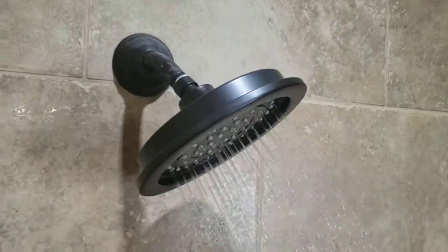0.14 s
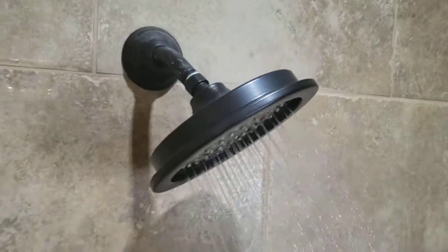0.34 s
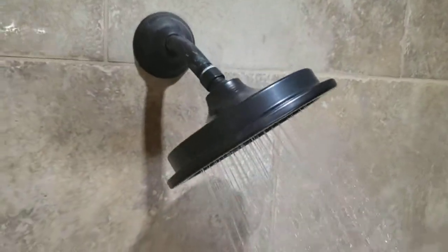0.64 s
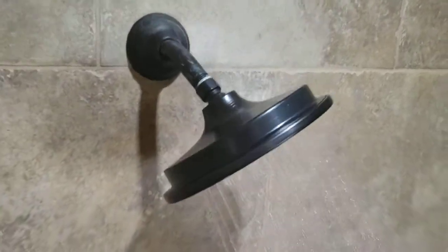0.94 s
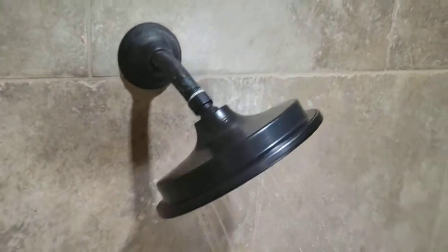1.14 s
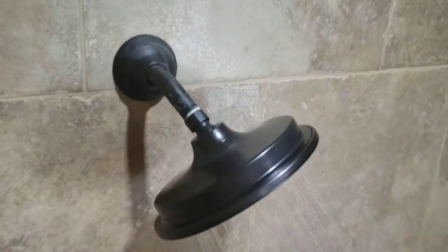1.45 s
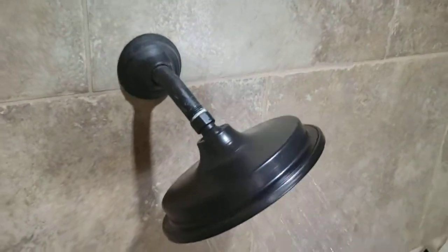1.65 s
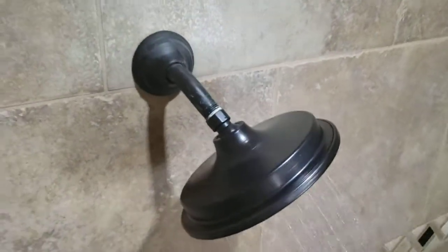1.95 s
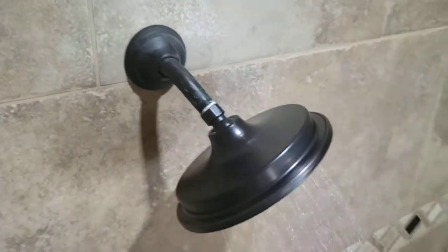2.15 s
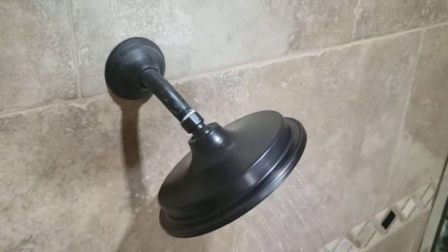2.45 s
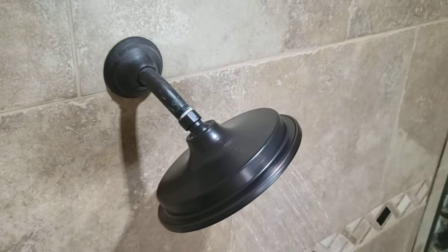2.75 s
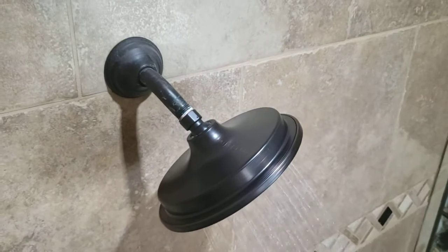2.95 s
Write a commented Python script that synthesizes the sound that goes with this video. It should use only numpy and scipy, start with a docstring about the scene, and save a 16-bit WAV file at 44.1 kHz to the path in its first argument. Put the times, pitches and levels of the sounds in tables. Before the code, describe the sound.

Steady shower spray hissing close by, water pattering on tile, with small drips and brief spits

```python
"""A shower head sprays in a tiled stall, close to a hand-held camera that rises past it. Throughout, noise from
fine jets fizzes high up, spray patters on tiles, a dull wash and hum lie beneath, and the hand on the camera
rumbles low. From the first moments fat drops plink as rising sines; soon gushes, gurgles and sputters join as
noise bursts. Near 1 s the camera passes the head and the air modes change; sputters crowd at 1.3 s. The hand
bumps the camera at 1.4 s and 2.7 s, each a smooth pulse; two higher gurgles close the scene."""
import sys
import numpy as np
from scipy import signal
from scipy.fft import rfft, irfft, next_fast_len
from scipy.io import wavfile
from scipy.ndimage import uniform_filter1d, map_coordinates

SR = 44100
rng = np.random.default_rng(int(sys.argv[2]) if len(sys.argv) > 2 else 0)


def waveform_to_disk(signal):
    """Save audio, clipped to [-1, 1], as 16-bit WAV at the path in sys.argv[1]."""
    frames = np.transpose(np.atleast_2d(signal))
    scaled = np.clip(frames, -1, 1) * 32767
    samples = np.round(scaled).astype(np.int16)
    wavfile.write(sys.argv[1], SR, samples)


N = 136269

# Levels are those at the source, ahead of the microphone colour.
# Low rumble: (time [s], level [dB], left-right [dB]); spectrum (frequency [Hz], gain [dB])
RUMBLE_LEVEL = [(0.0, -57.5, -3), (0.96, -65.5, 8), (1.94, -63.5, 6), (3.09, -64, 2.5)]
RUMBLE_SPECTRUM = [(22, -17), (32, -25), (47, 19), (60, -6), (70, -26)]
# Stall hum: (time [s], level [dB], left-right [dB]); spectrum (frequency [Hz], gain [dB])
HUM_LEVEL = [(0.0, -63, -1), (0.11, -52, 3), (0.21, -62, 1.5), (1.29, -54.5, 4), (1.36, -61.5, 8),
             (1.51, -53.5, 4), (2.54, -58, 3), (2.83, -49, 2.5), (2.96, -54, 2), (3.09, -58, 4)]
HUM_SPECTRUM = [(58, -33), (68, -5), (79, 0), (100, -13), (118, 0.5), (132, 0.5), (160, -10), (200, -59)]
# Dull wash of the stall: (time [s], mean level [dB], left-right [dB]); spectrum (frequency [Hz], gain [dB])
WASH_LEVEL = [(0.0, -50.5, -4), (0.02, -52, 0.5), (0.54, -52.5, 2), (0.68, -55.5, 2), (0.8, -49.5, 2),
              (0.89, -55, 3), (1.21, -52.5, -1), (1.27, -49, 3), (1.4, -53.5, 1.0), (2.22, -56, 0),
              (3.0, -54, 0), (3.09, -58, -2)]
WASH_SPECTRUM = [(88, -42), (150, -8), (206, -7), (495, -3.5), (618, -11.5), (787, -0.5), (883, -9),
                 (1500, -11.5), (1950, -99), (3300, -120)]
# Air modes between the walls:
# (frequency [Hz], width at half lift [Hz], lift below the head [dB], lift above the head [dB])
AIR_MODES = [(191, 27, 9, 4.5), (256.3, 22, 9, 6.5), (323, 11, 4.5, -2), (370.3, 25, 5.5, 7.5),
             (470, 28, 8, 3.5), (498.6, 9.9, -3, 10.5), (570.5, 6.7, 6, 12), (812, 31, 6, -1),
             (997, 33, 9.5, 8.5), (1592, 25, 8, 9.5), (1850, 27, 8.5, 7.5), (2095, 250, 0.5, 4.5),
             (4080, 180, 1.5, 3.5)]
# Gurgles: (start [s], length [s], top level [dB], left-right [dB], centre [Hz], Gaussian sigma [Hz])
GURGLES = [(0.303, .17, -55, 6, 470, 38.4), (0.47, 0.16, -52.5, 6, 477, 39),
           (2.527, 0.3, -52.5, 5, 2130, 110), (2.89, 0.17, -53, 5, 2200, 119)]
# Hand bumps: (time [s], nominal level [dB], left-right [dB])
BUMPS = [(1.381, -35, 14.5), (2.68, -37, 16)]
# Fat drops: (time [s], level before decay and soft start [dB], left-right [dB], starting pitch [Hz])
DROPS = [(.025, -37.5, -1, 2470), (0.295, -34, 0, 2840), (1.26, -40.5, -1, 481), (1.253, -36, 1, 1350),
         (1.253, -38, -3, 1714), (1.279, -40, 0, 2650), (1.292, -41, -1, 2000), (1.298, -40, -1, 2200),
         (1.861, -35, -2, 1655), (2.242, -38, 2, 2136), (2.929, -39, -9, 3980), (2.97, -49, 1, 2160),
         (3.047, -40, 0, 3950)]
# Spray on the tiles: (time [s], mean level [dB], left-right [dB]); spectrum (frequency [Hz], gain [dB])
PATTER_LEVEL = [(0.0, -39, 2.5), (.59, -39.5, 2), (.66, -43.5, 1.5), (.74, -39, 1.5), (1.17, -41.5, 2),
                (1.31, -37.5, 2.5), (1.4, -42, 2), (1.55, -41, 1.5), (1.83, -42.5, -0.5), (2.02, -40, 0.5),
                (2.14, -43.5, 0.5), (2.22, -40.5, -1.5), (2.49, -43, -1), (3.09, -42, 0)]
PATTER_SPECTRUM = [(650, -30), (1100, -7.5), (1220, -8.5), (1560, -6.5), (1710, -7.5), (2100, -3.5),
                   (2880, -2.5), (4050, 0.5), (6290, -3.5), (7420, -15), (8000, -4.5), (10400, -18),
                   (17600, -120)]
# Sputters: (time [s], nominal peak [dB], left-right [dB], centre [Hz], body t60 [s], start/body amplitude [1])
SPUTTERS = [(0.3444, -14, 3.5, 11400, 0.065, .5), (0.3562, -11, 9, 12100, 0.27, 1.5),
            (0.5194, -20, 1.5, 11900, 0.039, .8), (0.6838, -11.5, 9, 11800, 0.045, .8),
            (0.7756, -16, 13, 11800, 0.18, .8), (0.9994, -17.5, 14, 12200, 0.16, 0.87),
            (1.1273, -15, 9, 13800, 0.12, .8), (1.2754, -17, 17, 13500, 0.1, .3),
            (1.291, -18, 22, 13000, 0.15, .3), (1.3125, -6, 20.5, 15400, 0.053, 1.2),
            (1.3344, -10.5, 8, 12500, 0.19, .6), (1.321, -11.5, 18, 13600, 0.11, .2),
            (1.9121, -21, 7, 12600, 0.06, .8), (2.0911, -16.5, 6, 11400, 0.15, .4),
            (2.132, -16, 5, 11700, 0.065, .2), (2.153, -15, 8, 12000, 0.12, 0.22),
            (2.3194, -22, 8, 11100, 0.1, .8), (2.509, -19, 7, 12100, 0.1, .2),
            (2.517, -15.5, 7, 12800, 0.13, .2)]
# Duller gushes: (time [s], nominal peak [dB], left-right [dB], centre [Hz], t60 [s])
SURGES = [(0.148, -25, 0, 3500, .1), (.543, -26, 2, 3900, 0.12), (1.261, -30.5, 6, 2140, 0.37),
          (1.941, -25.5, 4, 6600, 0.15), (2.324, -25.5, 0, 6800, 0.29), (2.914, -29, -3, 4300, .15)]
# Jet fizz: (time [s], level before the lift of JET_LIFT_DB [dB], left-right [dB]);
# spectrum (frequency [Hz], gain [dB])
JET_LEVEL = [(0.0, -32.5, 8), (0.27, -36, 9), (0.62, -34, 10.5), (1.02, -35, 11), (1.21, -35, 12),
             (1.31, -32.5, 15), (1.34, -35.5, 18.5), (1.45, -37.5, 4.5), (1.57, -38, 6), (2.1, -37, 5.5),
             (2.14, -37.5, 8.5), (2.64, -39, 7), (3.09, -37.5, 7)]
JET_SPECTRUM = [(4120, -14), (7000, -11.5), (7880, -19), (8960, -8), (11700, 2.5), (15100, 0.5),
                (15700, 3.5)]
# Left-right likeness of the water: (frequency [Hz], correlation [1])
LIKENESS = [(60, 0.98), (290, 0.9), (640, 0.59), (1200, 0.0065), (15000, 0)]
# Microphone colour: (frequency [Hz], left-right [dB])
MIC_COLOUR = [(1500, -0.5), (2500, -4), (5000, -6.5), (7300, -1), (8400, 5.5), (10000, -2), (12000, -8),
              (15500, -6)]

PASS_HEAD_S, PASS_LENGTH_S = 0.98, 0.91  # middle and length of the passage
BUMP_TIME_CONSTANT_S, BUMP_LIFT_DB = 0.002, 8.5
DROP_T60_AT_2KHZ_S, DROP_ATTACK_S = 0.043, 0.0017
DROP_PITCH_RISE = 0.058  # share of the pitch gained per DROP_T60_AT_2KHZ_S
BODY_SIGMA_HZ, START_SIGMA_HZ, START_T60_S = 1740, 2740, 0.018
SPUTTER_ATTACK_S, SPUTTER_CREST_DB = 0.0009, 12
JET_LIFT_DB, TOP_HZ = 4.0, 15750


def amp(db):
    """Amplitude from dB."""
    return 10 ** (np.asarray(db) / 20)


def unit(x):
    """Scale to rms 1."""
    return x / np.sqrt(np.mean(x ** 2) + 1e-20)


def along(points, hz):
    """Interpolate (Hz, value) points on a log-frequency axis."""
    f, v = np.transpose(points)
    return np.interp(np.log(hz + 1), np.log(f + 1), v)


def panned(db, pan_db):
    """Left and right gains, pan_db apart."""
    return amp(np.array([db + pan_db / 2, db - pan_db / 2]))


def level(rows):
    """Stereo gain along a (s, dB, left-right dB) curve."""
    s, db, pan_db = np.transpose(rows)
    t = np.arange(N) / SR
    return panned(np.interp(t, s, db), np.interp(t, s, pan_db))


def add_at(out, s, sound):
    """Add a stereo sound into out at time s."""
    out[:, round(s * SR):][:, :sound.shape[-1]] += sound


def wobble(knots_per_s):
    """Smooth random curve through normal knots."""
    knots = rng.standard_normal(int(N * knots_per_s / SR) + 4)
    return map_coordinates(knots, [np.arange(N) * knots_per_s / SR])


def filtered(x, response):
    """Multiply the spectrum of x by a response of frequency."""
    m = next_fast_len(x.shape[-1] + 8192)
    return irfft(rfft(x, m) * response(np.fft.rfftfreq(m, 1 / SR)), m)[..., :x.shape[-1]]


def closed(points):
    """Gain of a spectrum that is silent beyond its ends."""
    return lambda hz: amp(along(points, hz)) * (hz > points[0][0]) * (hz < points[-1][0])


def bell(hz, sigma_hz):
    """Gain of a Gaussian band."""
    return lambda f: np.exp(-.5 * ((f - hz) / sigma_hz) ** 2)


def decaying(kicks, life_s):
    """Give each kick an exponential tail with time constant life_s."""
    return signal.lfilter([1], [1, -np.exp(-1 / (life_s * SR))], kicks)


def droplets(per_s, spread_db, life_s):
    """Tiny impacts of uneven size, each a short puff of noise on both sides, rms 1."""
    chance, size = rng.random((2, N))
    impacts = (chance < per_s / SR) * amp(spread_db * size ** 2)
    return unit(decaying(impacts, life_s) * rng.standard_normal((2, N)))


def flicker(per_s, life_s):
    """Sudden small rises that fade, mean about 0, rms 1."""
    chance, size = rng.random((2, N))
    rises = decaying((chance < per_s / SR) * size, life_s)
    return unit(uniform_filter1d(rises - rises.mean(), size=60))


def water(gain, patchy_db, grains):
    """Noise patchy in time and frequency plus droplets, coloured, part-correlated left-right, rms 1."""
    z = signal.stft(rng.standard_normal((2, N)), nperseg=512)[2]
    field = uniform_filter1d(rng.standard_normal(z.shape[1:]), size=4, axis=0)
    field = unit(uniform_filter1d(field, size=7, axis=1))
    patchy = signal.istft(z * amp(patchy_db * field), nperseg=512)[1][:, :N]
    pair = unit(patchy) + grains

    def mid_side_gain(hz):
        turn = np.arccos(np.clip(along(LIKENESS, hz), 0, 1)) / 2
        return gain(hz) * np.array([np.cos(turn), np.sin(turn)])

    mid, side = filtered(pair, mid_side_gain)
    return unit(np.array([mid + side, mid - side]))


def air(x):
    """Air between the walls lifts its modes; the lifts crossfade as the camera passes the head."""
    def lift(column):
        def gain(f):
            return amp(sum(m[column] / (1 + (2 * (f - m[0]) / m[1]) ** 2) for m in AIR_MODES))
        return gain

    above = np.clip((np.arange(N) / SR - PASS_HEAD_S) / PASS_LENGTH_S + .5, 0, 1)
    return (1 - above) * unit(filtered(x, lift(2))) + above * unit(filtered(x, lift(3)))


def rumble():
    """Low band of noise from the hand handling the camera."""
    return level(RUMBLE_LEVEL) * water(closed(RUMBLE_SPECTRUM), patchy_db=1.0, grains=0)


def hum():
    """Lowest hum of the stall, a noise band with a wandering level."""
    return level(HUM_LEVEL) * water(closed(HUM_SPECTRUM), patchy_db=0.8, grains=0)


def wash():
    """Dull wash of the stall, noise coloured by the air modes."""
    noise = water(closed(WASH_SPECTRUM), patchy_db=1.4, grains=0)
    return amp(1.2 * wobble(8.6)) * level(WASH_LEVEL) * air(noise)


def gurgles():
    """Narrow bands of patchy noise swell and fade over half a sine."""
    out, t = np.zeros((2, N)), np.arange(N) / SR
    for s, length_s, db, pan_db, hz, sigma_hz in GURGLES:
        swell = np.sin(np.pi * np.clip((t - s) / length_s, 0, 1))
        noise = water(bell(hz, sigma_hz), patchy_db=5.9, grains=0)
        out += panned(db, pan_db)[:, None] * swell * noise
    return out


def bumps():
    """The hand bumps the camera: one soft push that swings back."""
    out, u = np.zeros((2, N + SR)), np.arange(SR // 8) / SR / BUMP_TIME_CONSTANT_S
    push = u * (2 - u) * np.exp(-u) / 2
    for s, db, pan_db in BUMPS:
        add_at(out, s, panned(db + BUMP_LIFT_DB, pan_db)[:, None] * push)
    return out[:, :N]


def drops():
    """Fat drops plink: decaying sines of rising pitch, the lower ones ringing longer."""
    out, t = np.zeros((2, N + SR)), np.arange(SR // 8) / SR
    attack = 1 - np.exp(-t / DROP_ATTACK_S)
    for s, db, pan_db, hz in DROPS:
        decay = amp(-60 * t / DROP_T60_AT_2KHZ_S * np.sqrt(hz / 2000))
        cycles = hz * t * (1 + DROP_PITCH_RISE / 2 * t / DROP_T60_AT_2KHZ_S)
        plink = decay * attack * np.sin(2 * np.pi * cycles)
        add_at(out, s, panned(db, pan_db)[:, None] * plink)
    return out[:, :N]


def patter():
    """Spray lands on the tiles: noise and tiny impacts, coloured by the air modes."""
    grains = amp(-9) * droplets(per_s=400, spread_db=12, life_s=.001)
    spray = water(closed(PATTER_SPECTRUM), patchy_db=1.5, grains=grains)
    return amp(1.0 * wobble(9)) * level(PATTER_LEVEL) * air(spray)


def sputters():
    """Bursts of coarse fizz: a broad sharp start over a narrower body; surges are body alone."""
    out, t = np.zeros((2, N + SR)), np.arange(SR // 4) / SR
    attack = 1 - np.exp(-t / SPUTTER_ATTACK_S)
    surges = [(*row, 0) for row in SURGES]
    for s, db, pan_db, hz, t60_s, start_ratio in [*SPUTTERS, *surges]:
        lump_db = np.repeat(rng.uniform(-4, 4, len(t) // 30 + 1), 30)[:len(t)]  # steps of 30 samples
        noise = amp(lump_db) * rng.standard_normal((2, len(t)))
        narrow = unit(filtered(noise, bell(hz, min(BODY_SIGMA_HZ, hz / 3))))
        broad = unit(filtered(noise, bell(hz, START_SIGMA_HZ)))
        body = amp(-60 * t / t60_s) * narrow
        start = start_ratio * amp(-60 * t / START_T60_S) * broad
        gain = panned(db - SPUTTER_CREST_DB, pan_db)[:, None]
        add_at(out, s, gain * (body + start) * attack)
    return out[:, :N]


def jets():
    """Fine fizz of the jets breaking up: high noise and tiny puffs, with small sudden flickers."""
    grains = amp(-7) * droplets(per_s=600, spread_db=12, life_s=.0006)
    fizz = water(closed(JET_SPECTRUM), patchy_db=1.1, grains=grains)
    flicker_db = 1.1 * flicker(per_s=70, life_s=0.014)
    return amp(JET_LIFT_DB + flicker_db) * level(JET_LEVEL) * fizz


def scene():
    """Sum the layers, background first."""
    background = rumble() + hum() + wash() + gurgles()
    return background + bumps() + drops() + patter() + sputters() + jets()


def record(dry):
    """Each microphone has its own colour; nothing is kept above the band limit."""
    heard = filtered(dry, lambda hz: panned(0, along(MIC_COLOUR, hz)))
    return filtered(heard, lambda hz: hz < TOP_HZ)


dry = scene()
out = record(dry)
waveform_to_disk(out)
```